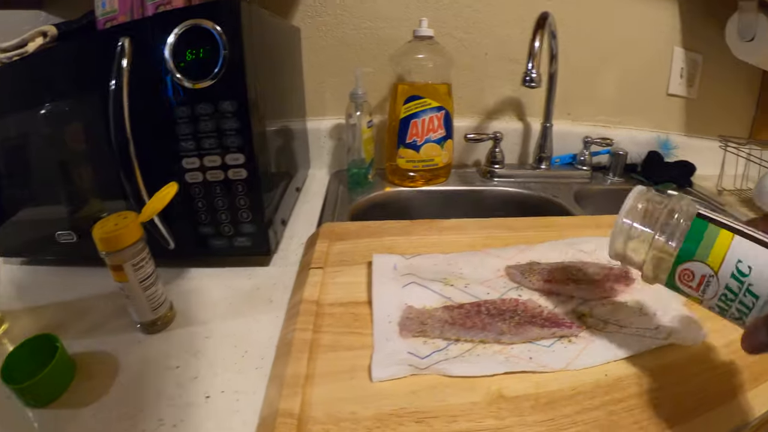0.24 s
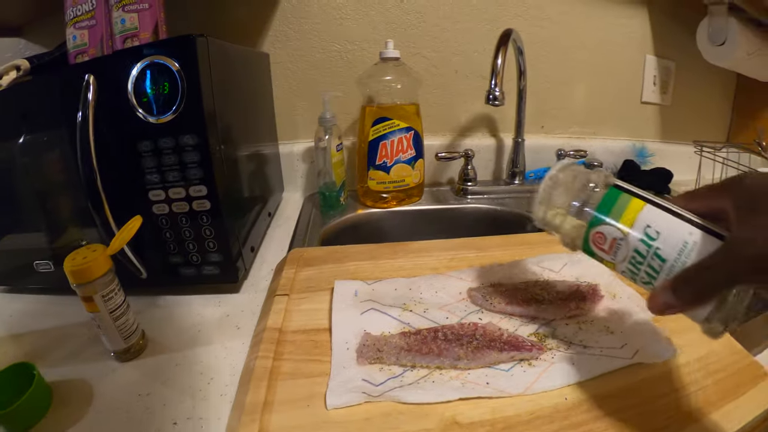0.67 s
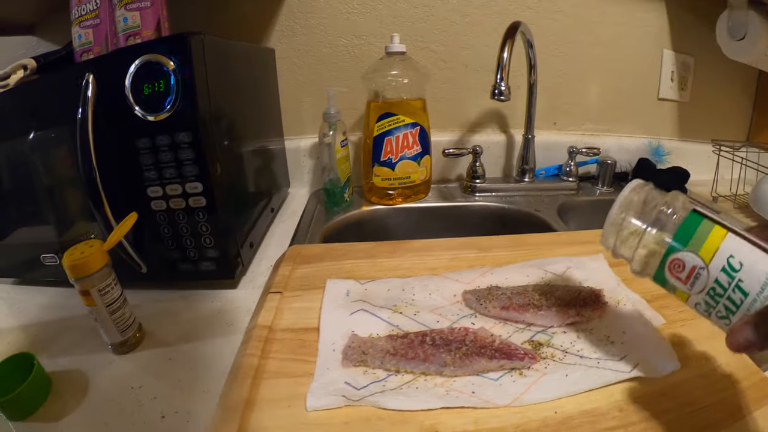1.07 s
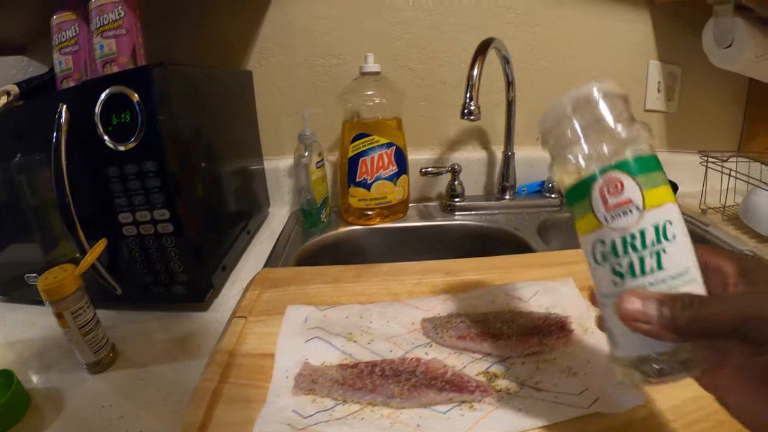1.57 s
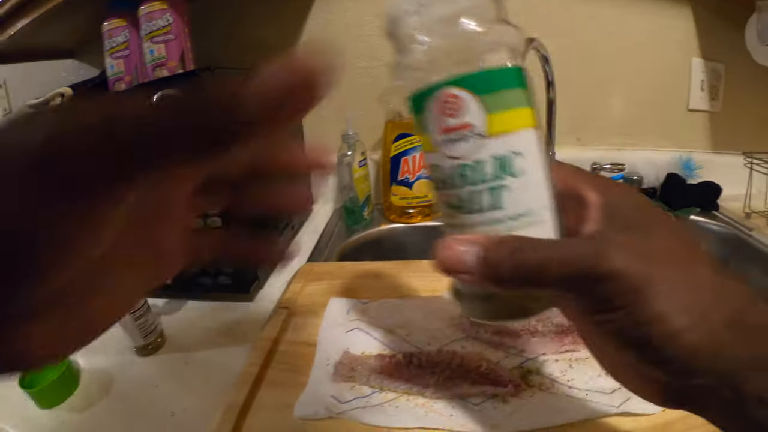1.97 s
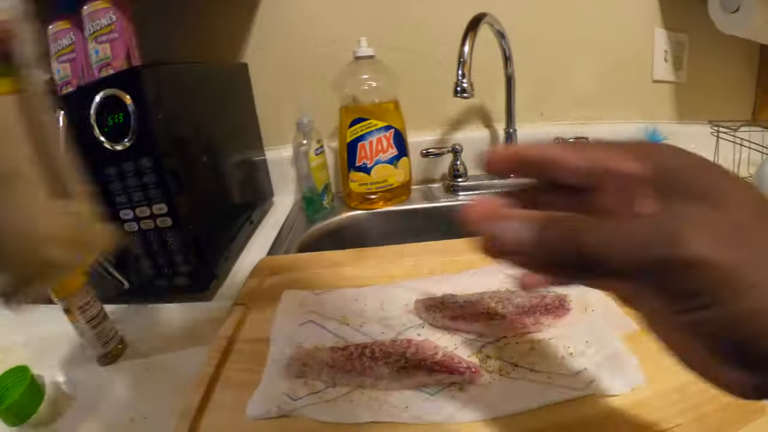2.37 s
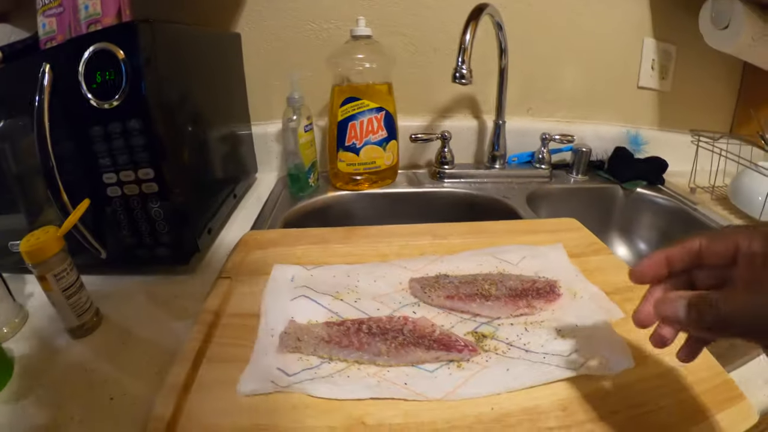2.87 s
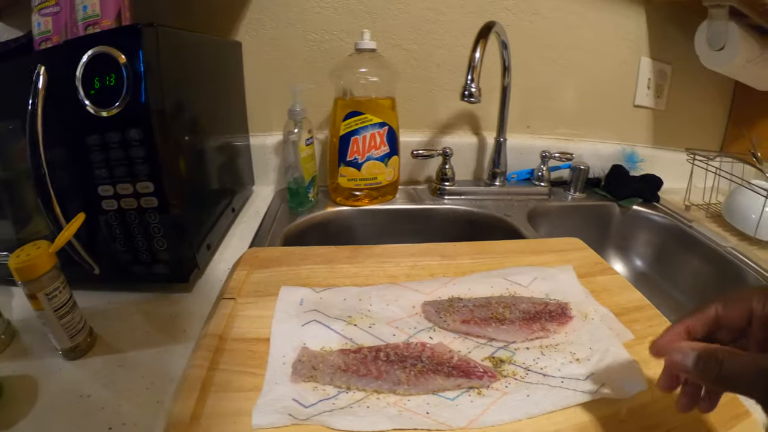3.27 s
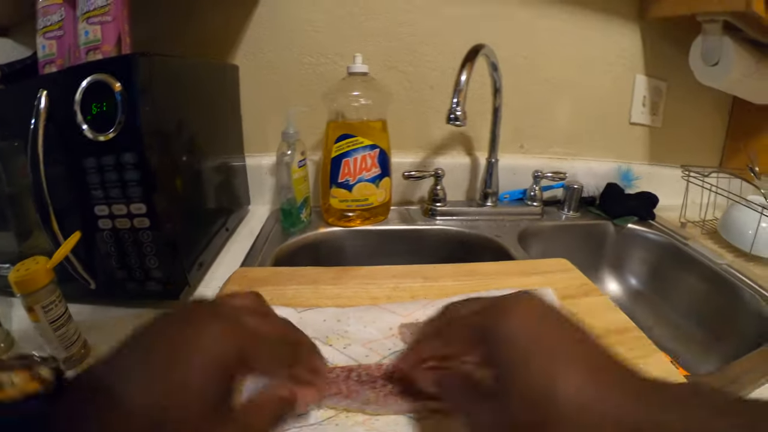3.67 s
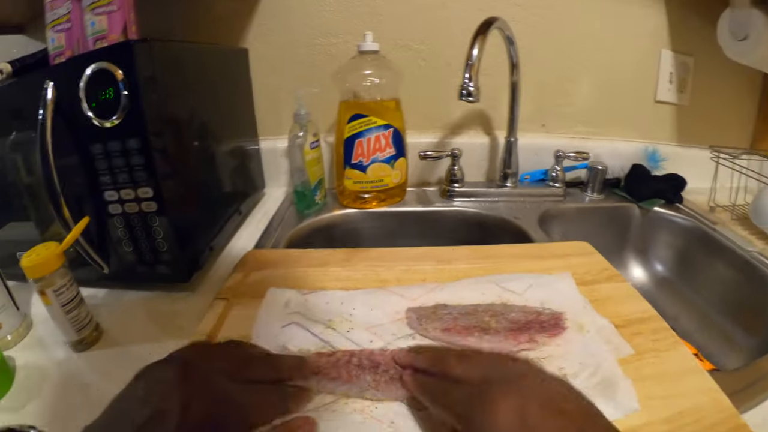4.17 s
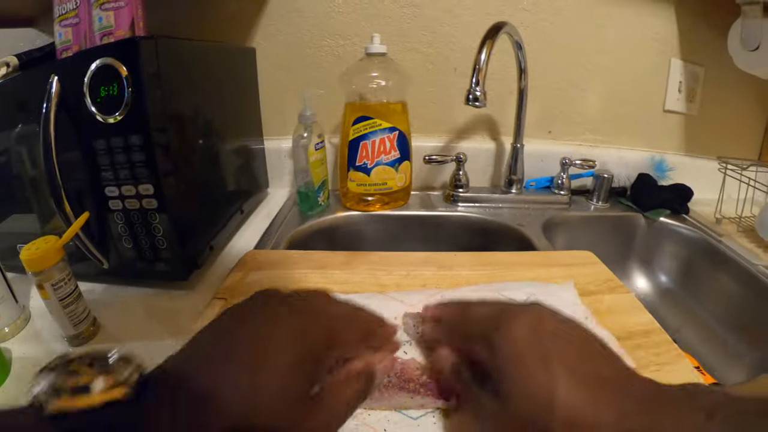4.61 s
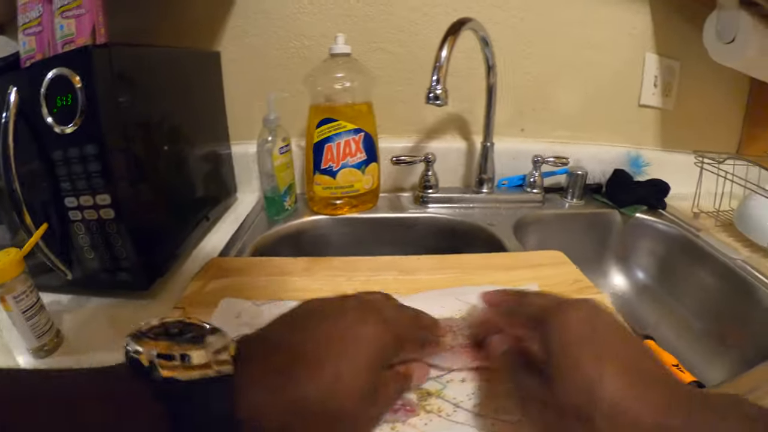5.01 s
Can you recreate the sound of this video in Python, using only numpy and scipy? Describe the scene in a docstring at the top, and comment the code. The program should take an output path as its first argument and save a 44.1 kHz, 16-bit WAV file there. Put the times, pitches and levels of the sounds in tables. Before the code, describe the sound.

Coarse seasoning is shaken from a plastic jar in a small kitchen, then a hard knock and a duller thud over a low fridge hum.

```python
"""In a small kitchen, coarse salt is shaken from a plastic jar over fish on a board, close to a chest-worn camera.
Random grains excite the jar wall, in throws and then in a stream as the salt slides back and the jar changes hands.
The jar set down and the knocked board ring as sums of decaying modes; ticks and taps are brief rings, and the
walls answer them. Fingers rub in filtered grains. A fridge hums in tones and shaped noise; arm movement rumbles."""
import sys
import numpy as np
from scipy import signal
from scipy.fft import rfft, irfft
from scipy.io import wavfile
from scipy.ndimage import uniform_filter1d

SR = 44100
rng = np.random.default_rng(int(sys.argv[2]) if len(sys.argv) > 2 else 0)


def to_linear_factor(level_db):
    """Convert decibel levels (scalar or array-like) to linear amplitude factors."""
    exponent = np.asarray(level_db, float) / 20
    return 10 ** exponent


def store_wav(level_fs):
    """Save 16-bit WAV to argv[1]."""
    pcm = np.round(np.clip(np.atleast_2d(level_fs), -1, 1) * 32767)
    wavfile.write(sys.argv[1], SR, pcm.T.astype(np.int16))


N = 231436
T = np.arange(N) / SR  # s
F = np.maximum(np.fft.rfftfreq(N, 1 / SR), 1)  # Hz


def over_hz(table):
    """Spectral envelope: a (Hz, value) table interpolated over log frequency."""
    hz, value = np.transpose(table)
    return np.interp(np.log(F), np.log(hz), value)


def over_time(table):
    """Temporal envelope: the columns of a curve at every sample, and a gate open while the curve lasts."""
    s, *columns = np.transpose(table)
    lasting = 1. * ((T > s[0]) & (T < s[-1]))
    gate = uniform_filter1d(lasting, size=800)
    return gate, [np.interp(T, s, column) for column in columns]


def shape(x, gain):
    """Linear filtering: each frequency bin is scaled by its gain, and the result brought to rms 1."""
    y = irfft(rfft(x) * gain, N)
    return y / np.sqrt(np.mean(y ** 2))


def peak(hz, width):
    """Resonance: the complex response of one damped oscillator, unity at its centre."""
    return 1 / (1 + 1j * (F ** 2 - hz ** 2) / (F * width))


def pan(db):
    """Level difference between channels: left and right gains, db apart."""
    return to_linear_factor(np.array([[db / 2], [-db / 2]]))


def walk(rate):
    """Random modulation: levels held 1 / rate s and slewed twice; spread near 1."""
    hold = int(SR / rate)
    steps = np.repeat(rng.standard_normal(N // hold + 1), hold)
    return 1.06 * uniform_filter1d(uniform_filter1d(steps, hold), hold)[:N]


def swell(s, spread):
    """Gaussian envelope: a bell-shaped rise and fall, peaking at 1."""
    return np.exp(-((T - s) / spread) ** 2 / 2)


# Likeness of scattered sound at the two microphones. Each row: frequency in Hz, left-right correlation -1..1.
CORRELATION = [(60, 0.44), (130, 0.53), (290, 1), (640, 0.4), (1400, -0.32), (3090, 0.76), (6800, 0.076),
               (15000, -0.19)]


def pair(two):
    """Interchannel coherence: two unrelated signals mixed to the correlation of the two microphones."""
    c = np.clip(over_hz(CORRELATION), -.99, .99)
    mid = rfft(two[0]) * np.sqrt((1 + c) / 2)
    side = rfft(two[1]) * np.sqrt((1 - c) / 2)
    return irfft(np.array([mid + side, mid - side]), N)


def grains(share, spread_db):
    """Granular excitation: dense random clicks whose sizes are exponentially spread in dB."""
    hit = rng.random((2, N)) < share
    size = to_linear_factor(spread_db * rng.exponential(size=(2, N)))
    return pair(hit * rng.standard_normal((2, N)) * size)


# Response of the microphones. Each row: frequency in Hz, gain in dB.
MICROPHONE_RESPONSE = [(12, -12), (40, 0), (9500, 0), (12000, -10), (15000, -20)]


def microphone_gain():
    """Transducer response: the gain of the microphones at every frequency."""
    return to_linear_factor(over_hz(MICROPHONE_RESPONSE))


MOTOR_HZ = 59.23
# Harmonics of the fridge motor. Each row: multiple of MOTOR_HZ, mean level in dB rms.
MOTOR_TONES = [(1, -63), (2, -65.5), (5, -62), (8, -69.5), (9, -74.5), (10, -74.5), (15, -76)]
# Resonances of the cabinet. Each row: frequency in Hz, width in Hz, level in dB rms.
CABINET_MODES = [(181.5, 8.2, -59), (257, 15.3, -60.5), (295.1, 20.3, -57.5), (368.9, 9.8, -62.5),
                 (694, 16.3, -62)]
# Colour of the air noise. Each row: frequency in Hz, relative level in dB.
AIR_COLOUR = [(18, -23), (30, -19), (102, -8.5), (168, -8), (291, -1.5), (559, -14), (707, -9.5),
              (764, -15.5), (967, -20.5), (1470, -18.5), (2230, -34.5), (7610, -39.5), (10400, -49),
              (13500, -60), (15400, -84)]
AIR_DB = -53  # mean level
WHINE_HZ, WHINE_DB = 5566, -93.5  # electrical tone; mean level in dB rms


def fridge():
    """Harmonic and broadband radiation: motor tones, cabinet resonances, a faint whine and air noise."""
    tones = 0
    for multiple, db in MOTOR_TONES:
        level = to_linear_factor(db + 0.5 * walk(4.02)) * np.sqrt(2)
        tones = tones + level * np.sin(2 * np.pi * (multiple * MOTOR_HZ * T + rng.random()))
    noise = pair(rng.standard_normal((2, N)))
    cabinet = sum(to_linear_factor(db) * shape(noise, peak(hz, width) ** 2) for hz, width, db in CABINET_MODES)
    air_noise = shape(pair(rng.standard_normal((2, N))), to_linear_factor(over_hz(AIR_COLOUR)))
    air = to_linear_factor(AIR_DB + 2.13 * walk(4.594)) * air_noise
    whine = to_linear_factor(WHINE_DB + 2.8 * walk(3.33)) * np.sqrt(2) * np.sin(2 * np.pi * WHINE_HZ * T)
    return tones + cabinet + air + whine


# Arm movement felt by the camera. Each row: time in seconds, level in dB before the random jolts.
MOVEMENT = [(0.0, -58), (0.03, -48.5), (0.14, -47), (0.25, -75), (0.29, -51), (0.42, -47.5), (0.47, -62.5),
            (0.86, -44.5), (1.34, -48.5), (1.4, -60), (2.03, -63), (2.37, -45), (2.48, -66), (2.82, -51.5),
            (3.0, -64), (4.79, -71), (4.92, -59), (5.25, -77)]
JOLT_DB, JOLTS_PER_S = 3, 12  # unevenness of the movement


def rumble():
    """Structure-borne excitation: noise drives the slow wobble of the mount, nearly alike in both channels."""
    _, (db,) = over_time(MOVEMENT)
    one, other = rng.standard_normal((2, N))
    both = one + 0.1 * other * np.array([[1], [-1]])
    wobble = shape(both, peak(28.2, 16.0) ** 2) + 0.29 * shape(both, peak(60, 70) ** 2)
    return to_linear_factor(db + JOLT_DB * walk(JOLTS_PER_S)) * wobble


# Throws of salt against the jar lid, about 13 a second. Each row: centre in seconds, level in dB.
THROWS = [(.076, -65), (.148, -63), (.229, -61), (0.316, -53), (.390, -57.5), (.470, -59.5), (.548, -57.5),
          (.621, -56), (0.693, -52.5), (0.944, -56), (1.006, -60), (1.097, -57.5), (1.172, -64),
          (1.255, -61)]
# Salt sliding in the turned jar. Each row: time in seconds, level of the high band in dB before flutter,
# level of the low band against it in dB.
SLIDING = [(1.3, -74, -4), (1.434, -57, -1.5), (1.63, -57.5, -2), (1.7, -65, -1), (1.762, -56.5, -1.5),
           (1.856, -59, -4), (1.922, -49.5, -7), (2.068, -65.5, -13), (2.104, -74.5, -3),
           (2.156, -55.5, 2.5), (2.166, -66.5, -1), (2.246, -67, 5.5), (2.284, -61, 1.5),
           (2.302, -64.5, -3.5), (2.368, -51.5, -5), (2.49, -73.5, -10), (2.55, -77, 6)]
# Colour of the salt. Each row: frequency in Hz, relative level in dB.
SALT_COLOUR = [(880, -26), (1500, 2), (1770, -4.5), (2590, -4), (3300, -7.5), (6100, -1.5), (7640, -2),
               (13700, -17), (14700, -60), (15400, -62)]
# Modes of the jar wall. Each row: frequency in Hz, width in Hz, mean level in dB.
WALL_MODES = [(3500, 1040, -12.5), (6250, 540, -16.5), (7840, 290, -19)]
THROW_S = 0.023  # spread of one throw
WALL_DB, WALL_GROWTH = -2.5, 0.45  # wall ring over a -60 dB throw; extra dB of ring for each dB of throw


def salt():
    """Impact excitation of a shell: crystals strike the jar wall, in throws while shaken, in a stream as it turns."""
    crystals = grains(.3, 1.15)
    colour = to_linear_factor(over_hz(SALT_COLOUR))
    # the wall modes sound in patches, as the salt lands on one spot or another
    wall = sum(to_linear_factor(db + 2.1 * walk(13.7)) * shape(crystals, peak(hz, width) ** 2)
               for hz, width, db in WALL_MODES)

    throws = np.sqrt(sum((to_linear_factor(db) * swell(s, THROW_S)) ** 2 for s, db in THROWS))
    rings = throws * to_linear_factor(WALL_DB) * (throws * 1000 + 1e-9) ** WALL_GROWTH  # 1000: relative to -60 dB

    gate, (db, low_db) = over_time(SLIDING)
    high_band = F ** 4 / (F ** 4 + 4650.0 ** 4) / (1 + (F / 13800.0) ** 6)
    high = shape(crystals, colour * high_band) * to_linear_factor(1.7 * walk(30.54))
    low = shape(crystals, colour * np.abs(peak(2780, 2860)) ** 2) * to_linear_factor(1.3 * walk(29.74))
    stream = gate * to_linear_factor(db) * (high + to_linear_factor(low_db) * low + to_linear_factor(-6.5) * wall)
    return pan(-1.7) * (throws * shape(crystals, colour) + rings * wall + stream)


# Small bright ticks. Each row: start in seconds, level of the ring in dB, ring in Hz, left minus right in dB.
BRIGHT_TICKS = [(0.761, -47, 5270, 3), (.7800, -51.5, 8400, 8), (1.5195, -49, 2800, -11),
                (2.053, -48, 6850, 2.5), (2.1303, -50, 3220, -1), (2.151, -36.5, 3020, 1),
                (2.1830, -43, 3330, 2), (2.5705, -55, 2580, -6), (3.3303, -55, 7250, 4),
                (4.0750, -59.5, 9700, -1), (4.5502, -27.5, 7620, 8.5), (4.5930, -45.5, 7450, 3),
                (5.2016, -54, 4780, 0), (5.2260, -55, 4810, .5)]
# Duller taps of fingertips and of the hollow jar bottom. Each row: start in seconds, starting level in dB,
# ring in Hz, left minus right in dB.
DULL_TAPS = [(1.5194, -50.5, 2370, -8), (2.151, -42, 1040, 5), (2.1830, -54, 1600, 2),
             (2.57, -54, 1360, -6), (2.8603, -12, 410, -2), (3.3303, -46, 880, 3), (3.331, -56.5, 2170, 5),
             (4.5930, -51, 2130, 4), (4.5935, -45.5, 850, 2), (5.2260, -56, 2520, .5)]
SNAP, TAP_T60_S = 0.45, .02  # gain of the broad snap in a tick; decay of a tap by 60 dB


def ticks():
    """Transient response: a tick is a brief bright ring with a broad snap, a tap a duller, longer ring."""
    length = 1024
    out, t = np.zeros((2, N + length)), T[:length]
    push = t / .0003 * np.exp(1 - t / .0003)  # peaks at 1 after 0.3 ms
    for s, db, hz, pan_db in BRIGHT_TICKS:
        snap = np.diff(rng.standard_normal(length + 1))
        tick = (np.sin(2 * np.pi * hz * t) + SNAP * snap) * push
        out[:, int(s * SR):][:, :length] += pan(pan_db) * to_linear_factor(db) * tick
    for s, db, hz, pan_db in DULL_TAPS:
        tap = to_linear_factor(db - 60 * t / TAP_T60_S) * np.sin(2 * np.pi * hz * t)
        out[:, int(s * SR):][:, :length] += pan(pan_db) * tap
    return irfft(rfft(out[:, :N]) * microphone_gain(), N)


# Colour of the echo from the walls. Each row: frequency in Hz, relative level in dB.
ECHO_COLOUR = [(150, -25.5), (500, -12), (1500, -1), (4000, -12), (9000, -10.5), (15000, -18)]


def room(x, t60, db):
    """Reverberation: tiled walls answer after 4 ms, near surfaces first, then a dense exponential tail."""
    noise = shape(pair(rng.standard_normal((2, N))), to_linear_factor(over_hz(ECHO_COLOUR)))
    decay = to_linear_factor(-60 * T / t60) + to_linear_factor(9 - 60 * T / 0.057)
    tail = noise * decay * (T > .004)
    tail = tail[:, :SR // 2] / np.sqrt(np.sum(tail ** 2) / 2)
    mono = x.mean(axis=0)[None]
    return to_linear_factor(db) * signal.fftconvolve(mono, tail, axes=1)[:, :N]


# Strokes of fingers and cloth. Each row: centre in seconds, level in dB, spread in seconds, centre in Hz.
STROKES = [(.81, -69.5, .05, 5060), (2.62, -65, 0.047, 1600), (3.26, -72, 0.044, 3630),
           (3.7, -72.5, 0.053, 3500), (3.88, -74, .018, 6960), (4.09, -72.5, 0.029, 6940),
           (4.26, -65, 0.026, 5000), (4.62, -70, .028, 6000), (4.77, -71.5, .027, 3500),
           (4.897, -66, 0.014, 2490), (5.12, -67.5, .022, 4730), (5.21, -76, 0.032, 4950)]


def fingers():
    """Friction noise: skin, paper and sleeve creak in fine uneven grains, band-filtered stroke by stroke."""
    creak = shape(grains(.25, 1.9), microphone_gain())
    return sum(to_linear_factor(db) * swell(s, spread) * shape(creak, peak(hz, 2.0 * hz) ** 2)
               for s, db, spread, hz in STROKES)


# The jar caught in the hand. One row: centre in seconds, peak in dB, spread in seconds.
PALM_CATCH = (2.1600, -32, .0023)


def thump(s, db, spread):
    """Pressure pulse: a palm catches the jar in one soft push with a dip either side."""
    u = (T - s) / spread
    return to_linear_factor(db) * (1 - u ** 2) * np.exp(-u ** 2 / 2)


def knock(blows, modes, colour, contact):
    """Modal superposition: a blow rings the low modes; dense upper ones give a crack and a fading clatter."""
    rise, clatter_t60, crack_db, crack_t60, pan_db = contact
    body, loose = np.zeros(N), np.zeros((2, N))
    clatter = shape(pair(rng.standard_normal((2, N))), to_linear_factor(over_hz(colour)))
    for s, db, clatter_db in blows:
        t = np.maximum(T - s, 0)
        ring = 0
        for k, (hz, mode_db, t60) in enumerate(modes):
            # neighbouring modes swing in opposite directions under the point of contact
            ring = ring + (-1) ** k * to_linear_factor(mode_db - 60 * t / t60) * np.sin(2 * np.pi * hz * t)
        body += to_linear_factor(db) * (1 - np.exp(-t / rise)) * ring
        fading = to_linear_factor(crack_db - 60 * t / crack_t60) + to_linear_factor(-60 * t / clatter_t60)
        loose += (1 - np.exp(-2 * t / rise)) * clatter * to_linear_factor(clatter_db) * fading
    return irfft(rfft(body + pan(pan_db) * loose) * microphone_gain(), N)


# Blows of the jar on the counter. Each row: start in seconds, level in dB, clatter in dB.
JAR_BLOWS = [(2.8597, -19.5, -31), (2.880, -35, -48)]
# Modes of the counter. Each row: frequency in Hz, relative level in dB, 60 dB decay in seconds.
COUNTER_MODES = [(74, -5.5, 0.52), (99, -8.5, 0.41), (183.7, -2, 0.22), (253.3, -3, 0.26),
                 (295, 3.5, 0.074), (382.2, -5, 0.18), (480.5, 2, 0.057), (494, -4, 0.12), (561, -1, 0.059),
                 (652, -18.5, 0.067), (735, -23, 0.048), (860, -12, 0.066), (1070, -9, 0.056)]
# Modes too dense to tell apart, and loose things shaken. Each row: frequency in Hz, relative level in dB.
COUNTER_COLOUR = [(180, -21), (300, -3), (577, -10.5), (700, -13), (959, -14.5), (1250, -23), (1590, -18),
                  (4120, -35), (8050, -36.5), (15000, -52)]
# Contact of jar and counter. One row: rise in seconds, clatter decay in seconds, crack over clatter in dB,
# crack decay in seconds, left minus right of crack and clatter in dB.
COUNTER_CONTACT = (0.0004, 0.43, 10, .036, 2.8)


def jar_set_down():
    """Impact on a plate: the jar meets the counter, whose modes ring and die away."""
    return knock(JAR_BLOWS, COUNTER_MODES, COUNTER_COLOUR, COUNTER_CONTACT)


# Blows on the board. Each row: start in seconds, level in dB, clatter in dB.
BOARD_BLOWS = [(4.899, -29, -54.5), (4.9192, -9.5, -33)]
# Modes of the board. Each row: frequency in Hz, relative level in dB, 60 dB decay in seconds.
BOARD_MODES = [(75, -20.5, 0.35), (112.5, -15.5, 0.29), (159, -10.5, 0.17), (211, 3, 0.11),
               (241.3, -12.5, 0.33), (317, -17, 0.27), (489, -25, 0.405), (574.4, -16.5, 0.18),
               (636, -37.5, 0.2)]
# Modes too dense to tell apart, and loose things shaken. Each row: frequency in Hz, relative level in dB.
BOARD_COLOUR = [(180, -33.5), (300, 3), (428, -8.5), (577, -8), (675, -8.5), (1260, -22), (1460, -14.5),
                (1800, -22.5), (2500, -25.5), (3800, -46.5), (9000, -59.5), (11700, -97), (19800, -120)]
# Contact on the board. One row: rise in seconds, clatter decay in seconds, crack over clatter in dB,
# crack decay in seconds, left minus right of crack and clatter in dB.
BOARD_CONTACT = (.0025, .28, 8, .07, -2)


def board_knock():
    """Impact on a plate: the knocked board rings in its own modes, with a slower rise of contact."""
    return knock(BOARD_BLOWS, BOARD_MODES, BOARD_COLOUR, BOARD_CONTACT)


def scene():
    """Superposition: near sounds, the hits among them with their echo, over hum and rumble."""
    hits = ticks() + thump(*PALM_CATCH) + jar_set_down() + board_knock()
    echo = room(hits, t60=0.33, db=-8)
    return fridge() + rumble() + salt() + hits + echo + fingers()


def roll_off(x):
    """The treble ends steeply here."""
    return signal.sosfilt(signal.butter(12, 15550, fs=SR, output="sos"), x)


def record(dry):
    """Signal chain: the finished mix goes through the camera."""
    return roll_off(dry)


dry = scene()
out = record(dry)
store_wav(out)
```